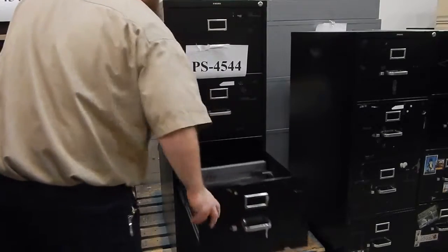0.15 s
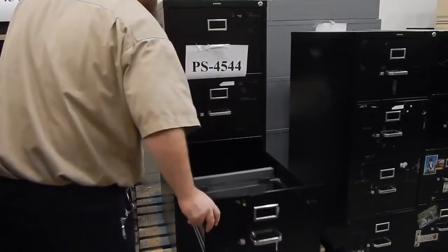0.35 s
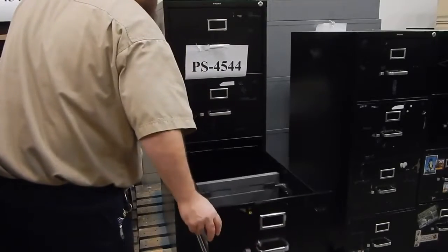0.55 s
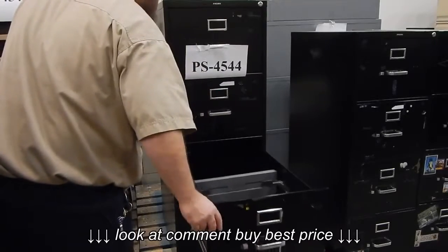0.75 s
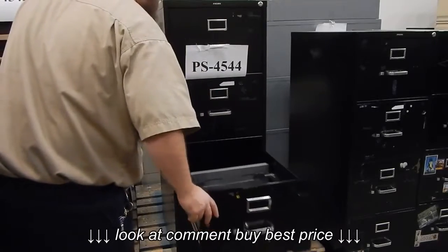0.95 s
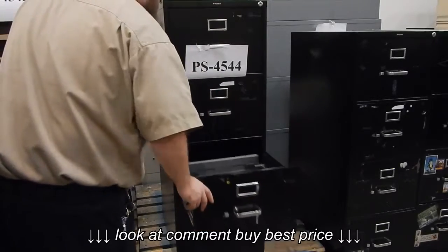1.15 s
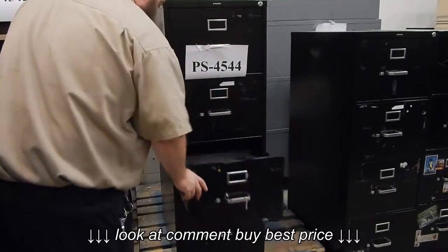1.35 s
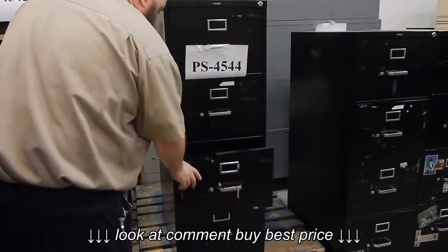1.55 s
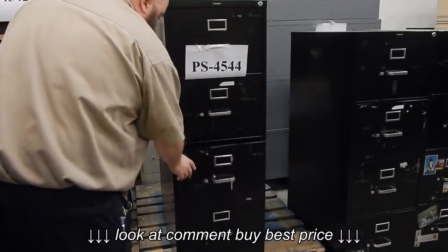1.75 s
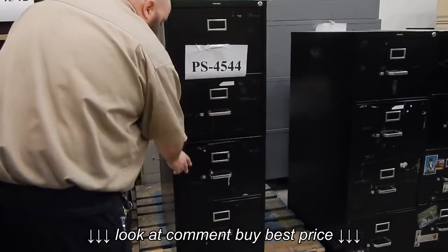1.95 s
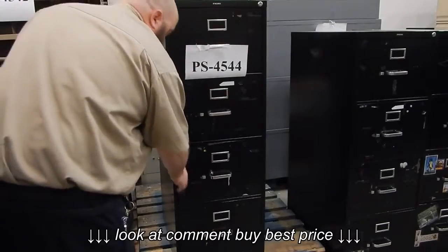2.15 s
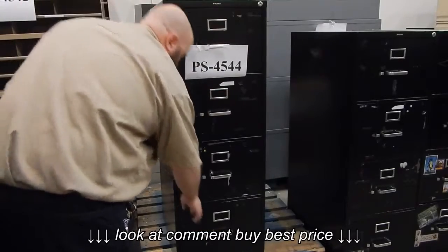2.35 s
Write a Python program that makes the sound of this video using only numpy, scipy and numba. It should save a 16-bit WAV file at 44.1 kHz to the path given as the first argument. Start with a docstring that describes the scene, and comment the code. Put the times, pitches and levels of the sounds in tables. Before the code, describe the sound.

Metal filing drawer clunks open, handle clacks, then it slides back and bangs shut, hard room

```python
"""A hard storage room: a sheet-steel file drawer is pulled open, knocks on its stop, its handle clacks,
then it rolls back and slams; the cabinet rocks once after the slam.
Every blow is a short rattle of contacts ringing the many modes of the cabinet; rollers tick and shake them.
Filtered noise makes the ventilation, decaying noise bands the room; stereo processing widens the treble."""
import sys
import numpy as np
from scipy import signal
from scipy.fft import rfft, irfft
from scipy.io import wavfile
from scipy.ndimage import uniform_filter1d, minimum_filter1d
from numba import njit

SR = 44100
rng = np.random.default_rng(int(sys.argv[2]) if len(sys.argv) > 2 else 0)


def materialize(psi):
    """Save the field psi as 16-bit PCM at rate SR to the path in sys.argv[1].

    A 1-D psi becomes a single channel; in a 2-D psi each row is a channel.
    """
    bounded = np.clip(np.atleast_2d(psi).T, -1, 1)
    quanta = np.round(bounded * 32767).astype(np.int16)
    wavfile.write(sys.argv[1], SR, quanta)


def volts(x):
    """Linear amplitude factor 10**(x/20) for a level x in dB, scalar or array-like."""
    e = np.asarray(x, float) / 20
    return 10 ** e


N = 110250


def on(table, hz):
    """Read an (Hz, value) table on a log-frequency axis."""
    t = np.array(table, float)
    return np.interp(np.log(np.maximum(hz, 1)), np.log(np.maximum(t[:, 0], 1)), t[:, 1])


def colour(x, table):
    """Filter by an (Hz, dB) table."""
    bin_hz = np.arange(N // 2 + 1) * SR / N
    return irfft(rfft(x) * volts(on(table, bin_hz)), N)


def unit(x):
    """Scale to rms 1."""
    return x / np.sqrt(np.mean(x ** 2))


def add(out, x, start_s):
    """Mix x into out at start_s."""
    i = int(start_s * SR)
    out[i:i + len(x)] += x[:N - i]


def ventilation():
    """Steady air noise whose level wavers by 1 dB rms."""
    # air spectrum: pitch_hz, density_db
    air = [(25, -26), (45, -4), (80, -5), (160, 6), (400, 7.5), (800, -2), (2000, -9.5), (5000, -12),
           (16000, -1)]
    level_db = -33
    waver_db = unit(uniform_filter1d(rng.standard_normal(N), SR // 6))
    return unit(colour(rng.standard_normal(N), air)) * volts(level_db + waver_db)


def room(x):
    """Diffuse tail: half-octave noise bands, each with its own decay, behind a soft onset."""
    # reverberation: pitch_hz, t60_s
    room_t60 = [(60, 1.9), (200, 1.94), (600, 1.16), (2000, 1.36), (6000, 0.83), (12000, 0.27)]
    onset_s = 0.0087
    t = np.arange(N) / SR
    bin_hz = np.arange(N // 2 + 1) * SR / N
    spec = rfft(rng.standard_normal(N))
    ir = 0
    for hz in 25 * 2 ** np.arange(0, 9.6, .5):
        t60_s = on(room_t60, hz)
        band = irfft(spec * np.clip(1 - 2 * abs(np.log2((bin_hz + 1) / hz)), 0, 1), N)
        ir = ir + band * volts(-60 * t / t60_s) / np.sqrt(t60_s * SR / 13.8)  # equal energy at any t60
    ir = ir * (1 - np.exp(-(t / onset_s) ** 2))
    return signal.fftconvolve(x, ir)[:N]


@njit
def ring(pole, gain, steps, size):
    """Sum of decaying modes struck once."""
    out = np.zeros(size)
    for k in range(len(pole)):
        z = gain[k] + 0j
        for i in range(min(size, steps[k])):
            out[i] += z.imag
            z *= pole[k]
    return out


def strike(hz, t60, gain):
    """Impulse response of a set of modes, 1 s long."""
    t60 = np.clip(t60, .01, 1.2)
    pole = np.exp(2j * np.pi * hz / SR - np.log(1000) / (t60 * SR))
    return ring(pole, gain, (t60 * SR).astype(np.int64), SR)


def rattle(length_s, rise_s):
    """A quick train of uneven contacts that swells and dies; energy 1."""
    contacts_per_s = 2500
    t = np.arange(SR // 5) / SR
    u = rng.random((2, SR // 5))
    contacts = (u[0] < contacts_per_s / SR) * np.log(u[1] + 1e-9)
    x = contacts * (1 - np.exp(-t / max(rise_s, 1e-4))) * np.exp(-t / max(length_s, .001))
    x[0] = -3 * np.exp(-rise_s / .001)  # firm first contact, the harder the shorter the rise
    return x / np.sqrt(np.sum(x ** 2))


def blow(hz, t60, gain, length_s, rise_s, count=4):
    """Several parts are shaken, each by its own rattle, each ringing its share of the modes."""
    scatter_db = 2  # spread of mode strength from blow to blow
    gain = gain * rng.choice([-1, 1], len(hz)) * volts(scatter_db * rng.standard_normal(len(hz)))
    out = 0
    for k in range(count):
        part = strike(hz[k::count], t60[k::count], gain[k::count])
        out = out + signal.fftconvolve(part, rattle(length_s, rise_s))
    return out


def panels():
    """Modes of the steel sheets, dense ones then strong ones: Hz, t60, gain."""
    # strong cabinet modes: pitch_hz, over_dense_db, t60_s (strike() caps it)
    strong_modes = [(82, 21, 0.92), (112.2, 12.5, 1.3), (147.2, 14.5, 0.9), (180, 1, 0.37),
                    (248, 10.5, 0.81), (384, 20.5, 0.086), (599.7, 10, 0.42), (659.3, 19, 0.29),
                    (965, 1, 0.24), (1205, 4.5, 0.22), (3680, 15, 0.22)]
    # mean ring of the dense modes: pitch_hz, t60_s
    panel_t60 = [(60, 1), (200, 0.91), (500, 0.41), (1500, 0.22), (4000, 0.19), (8000, 0.081),
                 (15000, 0.03)]
    strong_hz, strong_db, strong_t60 = np.array(strong_modes, float).T
    u = rng.random((2, 2400))
    hz = 40 + 15500 * ((np.arange(2400) + u[0]) / 2400) ** 2
    t60 = on(panel_t60, hz) * (.7 + .6 * u[1])
    dense_gain = (hz / 500) ** -.25
    strong_gain = (strong_hz / 500) ** -.25 * volts(strong_db)
    return np.r_[hz, strong_hz], np.r_[t60, strong_t60], np.r_[dense_gain, strong_gain] / 11


def rollers(hz, t60, gain):
    """Balls tick over the rails and shake the panels, low and high apart."""
    # roller course: time_s, rumble_db, rattle_above_rumble_db
    roll = [(0, -43, 8.5), (.2, -56.5, 17), (.6, -36, -6), (.8, -34.5, -5), (.9, -38.5, -4),
            (1.05, -47.5, 9.5), (1.148, -42.5, 7), (1.24, -50, 0), (1.66, -64, -1), (1.8, -53.5, 8)]
    ticks_per_s = 820
    t = np.arange(N) / SR
    time_s, rumble_db, rattle_db = np.array(roll, float).T
    u = rng.random((2, N))
    ticks = (u[0] < ticks_per_s / SR) * np.log(u[1] + 1e-9) / np.sqrt(2 * ticks_per_s / SR)
    ticks = ticks * volts(np.interp(t, time_s, rumble_db))
    high = hz ** 2 / (hz ** 2 + 250 ** 2)
    out = 0
    for share, db in ((1 - high, 0), (high, np.interp(t, time_s, rattle_db))):
        ir = strike(hz, 0.18 * t60, gain * share * rng.standard_normal(len(hz)))  # rings damped
        out = out + signal.fftconvolve(ticks * volts(db), ir / np.sqrt(np.sum(ir ** 2)))[:N]
    return colour(out, [(30, -6), (80, -1.5), (200, -1.5)])


def handle():
    """The loose handle drops and bounces: modes in close pairs plus a cloud of short treble modes."""
    # drops: start_s, level_db
    handle_hits = [(.699, -8.5), (.773, -16), (.853, -27.5)]
    # handle modes: pitch_hz, level_db, t60_s
    handle_modes = [(1366, -12, 0.058), (1507, -15.5, 0.13), (1925, -12.5, 0.076), (2068, -14, 0.04),
                    (3430, -8.5, 0.05), (4465, -4, 0.042)]
    m = np.array(handle_modes, float)
    m = np.r_[m, m * [1.02, 1, 1]]  # each mode's twin, 2 % higher
    cloud_hz = 1250 + 17 * (np.arange(600) + rng.random(600))
    hz = np.r_[m[:, 0], cloud_hz]
    t60 = np.r_[m[:, 2], np.full(600, .08)]
    gain = np.r_[volts(m[:, 1]), volts(-27) * (cloud_hz / 3000) ** -.3]
    out = np.zeros(N)
    for start_s, db in handle_hits:
        add(out, volts(db) * blow(hz, t60, gain, length_s=0.022, rise_s=0.00055), start_s)
    return out


def cabinet(hz, t60, gain):
    """Each blow lands elsewhere, so it weights the modes anew and favours two groups of them."""
    # blows: time_s (onset 1 ms earlier), boom_db, body_db, panel_db, clank_db, length_s, rise_s,
    # favoured_low_hz, favoured_high_hz
    blows = [(0.213, -29, -14, -12, -9, 0.0077, 0.011, 248, 1456),
             (0.61, -34.5, -28.5, -20.5, -26.5, 0.015, 0.00053, 248, 382),
             (1.366, -39.5, -60, -35, -48, 0.012, 0.0004, 780, 2210),
             (1.521, -33, -45.5, -38, -45, 0.0088, 0.00058, 184, 640),
             (1.684, -25.5, -17, -17.5, -24.5, 0.0077, 0.00039, 191, 900),
             (1.841, -27.5, -19.5, -16.5, -24, 0.0034, 0.00033, 178, 1660),
             (1.891, -34, -28.5, -21, -17, 0.038, 0.0022, 235, 690),
             (1.926, -19, -19.5, -15, -7, 0.017, 0.0015, 150, 1800),
             (1.949, -16.5, -40, -11.5, -16, 0.022, 0.001, 112, 3523),
             (2.04, -17.5, -33.5, -30, -30, 0.054, 0.0065, 82, 112)]
    # centres of sub, boom, body, panel, clank, edge: pitch_hz
    band_hz = [70, 170, 450, 1500, 4500, 11000]
    sub_over_boom_db, edge_over_clank_db = -21.5, 13
    favour_db, favour_oct = 7, 0.17
    grip = 0.33  # share of t60 lost to the contact in the high favoured group
    out = np.zeros(N)
    for time_s, boom, body, panel, clank, length_s, rise_s, low_hz, high_hz in blows:
        band_db = [boom + sub_over_boom_db, boom, body, panel, clank, clank + edge_over_clank_db]
        db = on(list(zip(band_hz, band_db)), hz)
        low = np.exp(-(np.log2(hz / low_hz) / favour_oct) ** 2)
        high = np.exp(-(np.log2(hz / high_hz) / favour_oct) ** 2)
        struck_gain = gain * volts(db + favour_db * (low + high))
        add(out, blow(hz, t60 * (1 - grip * high), struck_gain, length_s, rise_s), time_s - .001)
    return out


def scene():
    """Near sound in the middle; room and air differ between the sides, mostly in treble and deep bass."""
    # side signal of room and air: pitch_hz, level_db
    diffuse = [(25, 5), (100, -16), (400, -35), (2400, -20), (2700, -8.5), (6000, -8), (12000, 2)]
    room_db = -8.5
    steel = panels()
    near = cabinet(*steel) + handle() + rollers(*steel)
    mid = volts(room_db) * room(near) + ventilation()
    other = volts(room_db) * room(near) + ventilation()
    side = colour(other, diffuse)
    return near + mid + np.array([side, -side])


def low_pass(x):
    """Removes everything above the highest recorded frequency."""
    return signal.sosfilt(signal.butter(12, 16020, fs=SR, output="sos"), x)


def record(dry):
    """Hiss, recording colour; left and right channels differ in phase and level; a limiter holds the peaks."""
    # recording colour with a narrow notch near 2.5 kHz: pitch_hz, level_db
    recorder_colour = [(20, -10), (100, -1.5), (1500, -2), (2150, 0.5), (2440, -9.5), (2505, -25),
                       (2570, -5), (3750, 1), (4200, -4.5), (5000, -3.5), (6100, 0), (6800, -8),
                       (8000, -17), (9600, -25.5), (10200, -35.5), (15500, -45)]
    # left channel against right: pitch_hz, phase_lead_rad, level_db
    channels = [(40, 0.053, -0.3), (2500, 0, 0), (2750, 0.49, 1.1), (5000, 0.58, -1), (9000, 0.88, 0)]
    hiss_db, ceiling = -45.5, 0.95  # hiss ahead of the colour
    bin_hz = np.arange(N // 2 + 1) * SR / N
    # minimum phase by folding the cepstrum
    cepstrum = irfft(np.log(volts(on(recorder_colour, bin_hz))), N)
    fold = np.r_[1, np.full(N // 2 - 1, 2), 1, np.zeros(N // 2 - 1)]
    colouring = np.exp(rfft(cepstrum * fold))
    channel_hz, lead_rad, channel_db = np.array(channels, float).T
    # half of the difference on each side
    left = np.sqrt(volts(np.interp(bin_hz, channel_hz, channel_db)))
    left = left * np.exp(.5j * np.interp(bin_hz, channel_hz, lead_rad))
    hissing = dry + volts(hiss_db) * rng.standard_normal(dry.shape)
    x = irfft(rfft(hissing) * colouring * np.array([left, 1 / left]), N)
    gain = np.minimum(1, ceiling / (abs(x).max(axis=0) + 1e-9))
    x = x * uniform_filter1d(minimum_filter1d(gain, size=89), size=89)  # 2 ms windows
    return low_pass(x)


dry = scene()
out = record(dry)
materialize(out)
```